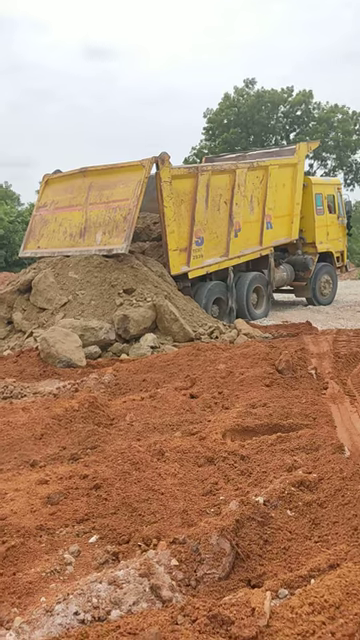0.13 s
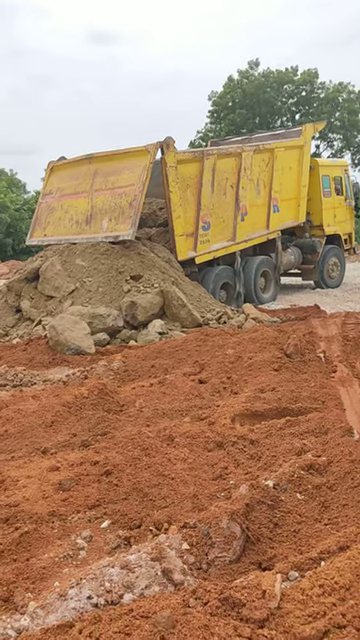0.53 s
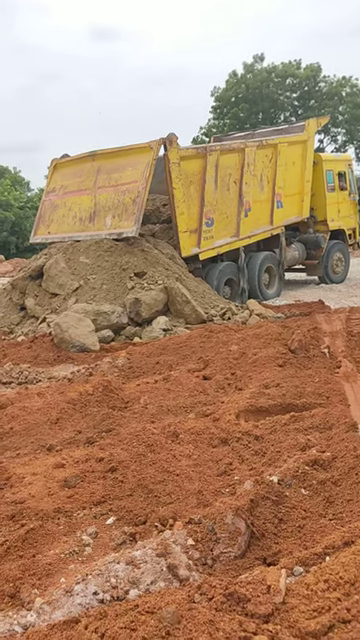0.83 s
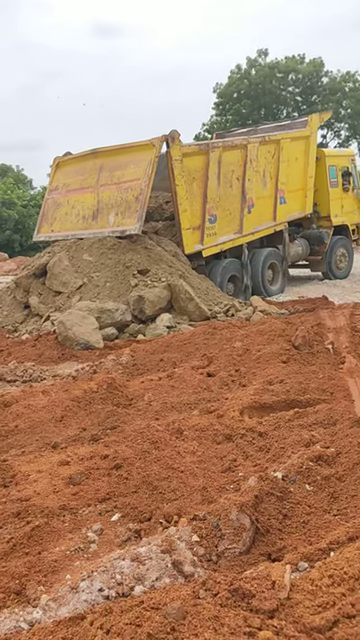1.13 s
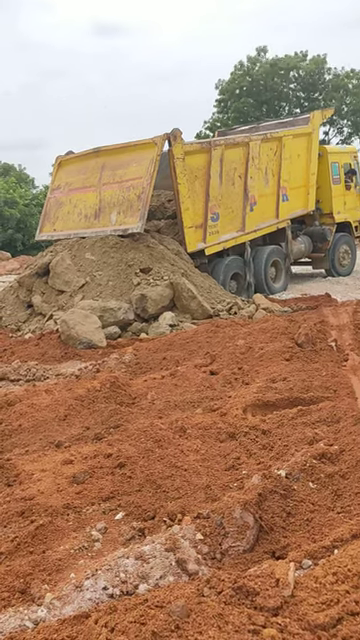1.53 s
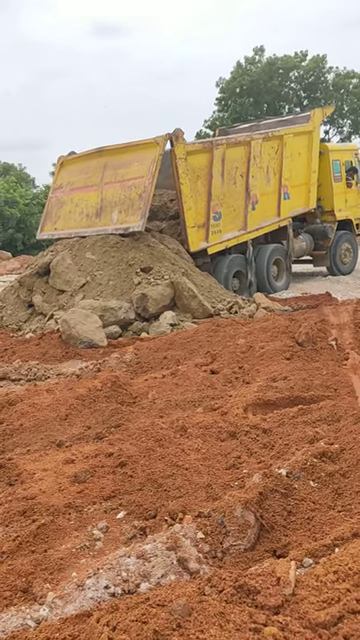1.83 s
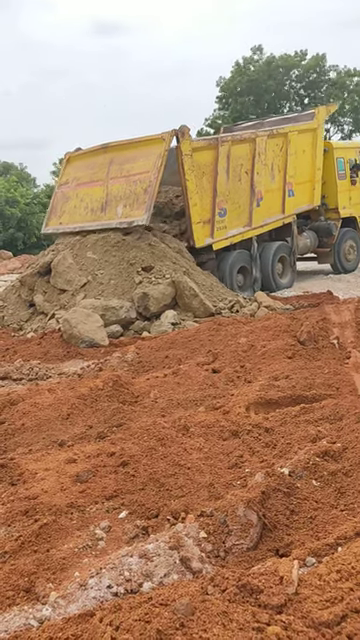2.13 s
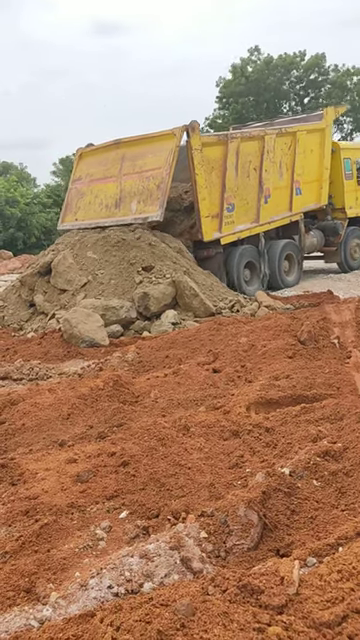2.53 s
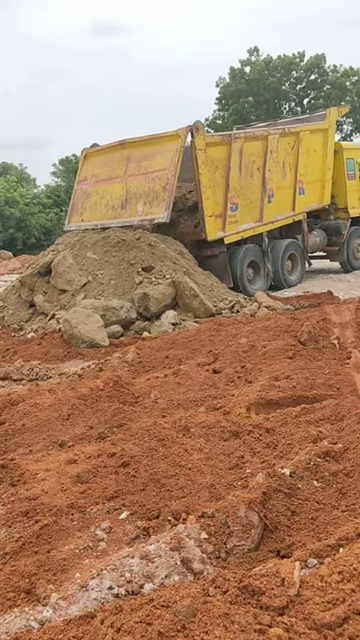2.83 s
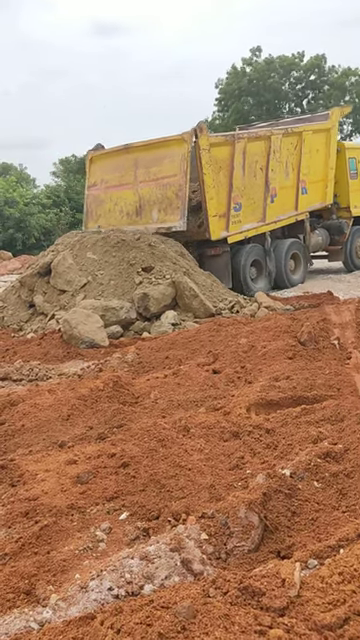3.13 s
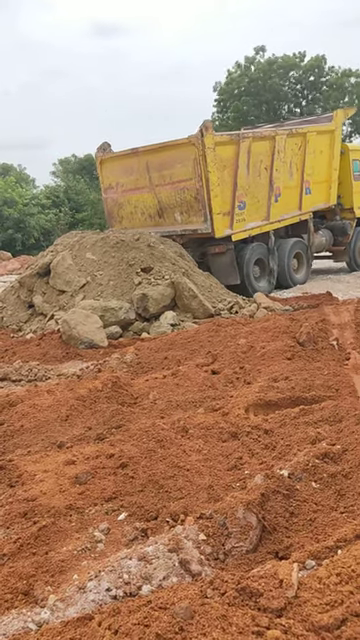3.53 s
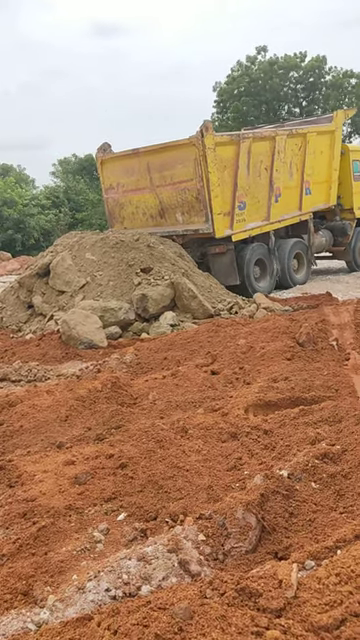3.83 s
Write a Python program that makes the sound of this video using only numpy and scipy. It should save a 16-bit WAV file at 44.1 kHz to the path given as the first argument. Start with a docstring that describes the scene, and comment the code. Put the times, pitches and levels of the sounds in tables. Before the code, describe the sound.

A tipper truck's steel tailgate slams late with a booming, ringing crash, then rebounds and seats. Before it, a diesel ticks at idle, wind buffets the microphone and loose steel clanks. Outdoors, stereo, some way off.

```python
"""Tipper truck and slamming tailgate

A tipper truck creeps away from its heap at idle: repeated bursts of noise make its diesel tick.
Its raised body clanks in short knocks and scrapes, shaped by the uneven resonances of steel.
The steel tailgate slips off the heap, slams, booms, rebounds once and seats: noise and tones that ring.
Gusts of low noise buffet the two ports of a microphone some way off, mostly the left one."""
import sys
import numpy as np
from scipy import signal
from scipy.fft import rfft, irfft, next_fast_len
from scipy.io import wavfile
from scipy.ndimage import map_coordinates

SR = 44100
rng = np.random.default_rng(int(sys.argv[2]) if len(sys.argv) > 2 else 0)


def store_pcm(level_fs):
    """Save levels as 16-bit WAV."""
    pcm = np.round(np.clip(level_fs, -1, 1) * 32767).astype(np.int16)
    wavfile.write(sys.argv[1], SR, np.atleast_2d(pcm).T)


N = 176400

# Spectra give the shape of a noise, whose overall level is set elsewhere.
# Rise and decay times are those of exponential curves.

# How the engine's loudness moves. Each row: time in seconds, relative loudness in dB.
ENGINE_LOUDNESS = [(.65, -2.5), (1.1, 0.5), (1.27, -2), (1.4, 1.5), (1.65, 2), (2.6, -1)]
# Spectra of the engine's clatter (also its whirr), knock and rumble.
# Each row: frequency in Hz, relative level in dB per Hz.
CLATTER_SPECTRUM = [(150, -12), (370, -5), (560, -4.5), (800, 3.5), (1050, -3.5), (1450, 0), (1750, -6),
                    (2750, -4.5), (3500, -11.5), (5500, -14), (7700, -8), (9200, -19)]
KNOCK_SPECTRUM = [(400, -0.5), (900, 1), (1400, 2.5), (2000, -6), (9000, -17)]
RUMBLE_SPECTRUM = [(80, 1.5), (125, -14), (200, -2), (500, -18), (1500, -40.5)]
# Faint whine of the engine's pump. Each row: frequency in Hz, middle level in dB.
PUMP_HUM = [(446.6, -53.5)]
FIRING_HZ, FIRST_FIRING_S, CYLINDERS = 26.26, 0.0186, 4
CLATTER_DB, CLATTER_DECAY_S, FIRING_RISE_S = -40.5, 0.014, 0.0015
KNOCK_DB, KNOCK_DECAY_S = -46, 0.021  # one cylinder knocks harder
WHIRR_DB, RUMBLE_DB = -35, -33.5

# Strength of the wind on each port. Each row: time in seconds, relative strength in dB.
GUSTS_LEFT = [(.55, -29), (.72, -28), (.95, -41.5), (1.5, -39.5), (1.62, -32), (1.83, -37.5), (1.92, -14),
              (2.06, -22.5), (2.12, -30), (2.28, -17), (2.68, -17.5), (2.9, -22.5), (3.1, -34), (3.18, -22),
              (3.6, -24.5)]
GUSTS_RIGHT = [(0, -39.5), (.55, -28.5), (.9, -46.5), (1.56, -37), (1.8, -29), (2.05, -34), (2.6, -29.5),
               (2.88, -23.5), (2.905, -17.5), (2.96, -30.5), (4, -36.5)]
# Spectra of the slow pressure swings, and of the flutter that strong gusts add.
# Each row: frequency in Hz, relative level in dB per Hz.
BUFFET_SPECTRUM = [(30, 0), (100, -0.5), (300, -11), (1500, -69)]
FLUTTER_SPECTRUM = [(30, -33), (80, -4), (170, 0.5), (270, -6.5), (400, -13.5), (800, -25), (4000, -71)]
# Both levels hold when the gust strength equals WIND_REF_DB.
BUFFET_DB, FLUTTER_DB, WIND_REF_DB = -27, -25.5, -26
BUFFET_GROWS = 0.78  # dB of swing for each dB of gust
LUMP_DB, LUMPS_PER_S = 1.7, 26  # size and rate of the random lumps in the flutter
RIGHT_FLUTTER_PITCH = 1.28  # the right port flutters higher than the left

# Clanks of the tipping gear. Each row: start in seconds, relative level of the knock in dB,
# relative level of the scrape in dB, pitch of the scrape in Hz.
CLANK_EVENTS = [(2.568, -23.5, -21.5, 6600), (2.610, -31, -45, 5400), (2.626, -32, -28, 6850),
                (2.641, -24.5, -35, 6800), (2.694, -31, -54, 5400), (2.82, -28, -26, 5640),
                (2.872, -35, -37, 5540)]
# Spectrum of the knocks. Each row: frequency in Hz, relative level in dB per Hz.
CLANK_SPECTRUM = [(100, -31), (350, 6), (750, 9.5), (1150, -6), (1500, 1), (4500, -3.5), (8300, -12),
                  (11000, -41)]
CLANK_RISE_S, CLANK_DECAY_S, CLANK_TAIL_DB, CLANK_TAIL_S = 0.0062, 0.014, -7.5, 0.054
SCRAPE_SHARPNESS = 6.4  # higher is closer to a single pitch

# Sharp eddies that thud on the right port. Each row: start in seconds, relative level in dB.
EDDY_EVENTS = [(2.897, -17.5), (2.918, -13.5)]
EDDY_PITCH, EDDY_DECAY_S = 1.94, 0.01  # pitch relative to the left port's flutter

# Blows of the tailgate. Each row: start in seconds, relative level of the clashing edges in dB,
# relative level of the ringing panel in dB.
TAILGATE_BLOWS = [(3.388, -26.5, -55), (3.409, -23, -26), (3.450, -12, -40), (3.465, -14, -10.5),
                  (3.552, -15.5, -41), (3.607, -20, -25), (3.802, -11, -32), (3.866, -23.5, -25)]
# Spectra of the clashing edges, the ringing panel, the crack of a blow and the sizzle of the slam.
# Each row: frequency in Hz, relative level in dB per Hz.
CLASH_SPECTRUM = [(700, -16), (2500, -1.5), (3700, -10.5), (6000, -9.5), (7700, 2), (9000, -11),
                  (11000, -40)]
PANEL_SPECTRUM = [(40, -1), (110, 5), (300, 0), (500, -4), (800, 1.5), (1020, -8), (1350, -2.5),
                  (1700, -11.5), (2700, -8.5), (3700, -18.5), (6000, -19), (7800, -9), (11000, -30.5)]
CRACK_SPECTRUM = [(100, 10), (600, 11), (2500, 3.5), (4000, -13), (15000, -26)]
SIZZLE_SPECTRUM = [(7000, -26), (10000, -7), (13500, -12.5)]
# How long the steel rings before the shut gate damps it.
# Each row: frequency in Hz, time to fall by 60 dB in seconds.
PANEL_RING_TIME = [(150, 8.1), (700, 4.1), (1400, 1.56), (3000, 0.97), (8000, 1.23), (12000, 0.13)]
# Strongest modes (natural tones) of the gate and body. Each row: frequency in Hz, relative level in dB.
STRONG_MODES = [(123, -9), (236, 1), (277, -1.5), (356, -13.5), (390, -3.5), (442, -7), (590, -8),
                (643, -5.5), (718, -2), (825, -3), (1306, -8), (2842, -15), (7623, -5.5), (8101, -6)]
CLASH_RISE_S, CLASH_DECAY_S = 0.0058, 0.033
MODES_DB = -11  # added to every strong mode
LOW_RISE_S, LOW_RISE_HZ = 0.025, 200  # rise time of the level at this pitch; lower pitches rise more slowly
CRACK_DB, CRACK_RISE_S, CRACK_DECAY_S = 8.5, 0.0021, 0.0064  # level relative to the blow's ring
SEATED_S, SEATED_DB_PER_S = 3.79, 48  # from this time the shut gate damps the ring
SEATED_HZ = 600  # strong modes below this pitch are damped less
SLAM_S, REBOUND_S = TAILGATE_BLOWS[3][0], TAILGATE_BLOWS[6][0]
THUMP_DB, THUMP_HZ, THUMP_DECAY_S = -19.5, 56.8, 0.12  # the rebound shakes the chassis
SIZZLE_DB, SIZZLE_DECAY_S = -6, 0.03  # only the slam sizzles

# Loose contacts and uneven resonances, for the clanks and the tailgate alike.
CONTACTS_PER_S, CONTACT_DECAY_S = 170, 0.003
CONTACT_SHARE = 0.4  # part of the power that comes in brief contacts
RESONANCE_DB, RESONANCE_DENSITY = 2.6, 2.2  # unevenness, and random heights per root Hz

# Colour of each microphone port; above about 9.5 kHz all sound also falls steeply. Each row: frequency in Hz,
# gain in dB.
COLOUR_LEFT = [(100, 3), (2500, -1.5), (4500, -4), (6300, -13), (7300, -14), (8400, 1.5), (9200, -0.5),
               (9800, -17)]
COLOUR_RIGHT = [(4300, -2.5), (5500, 2.5), (6300, -1.5), (7700, 5), (9200, 0), (9800, -14.5)]
# How much sound differs between the ports.
# Each row: frequency in Hz, scattered over direct sound as a ratio.
SCATTER_RATIO = [(100, 0.13), (600, 0.37), (2000, 0.74), (8000, 1)]
LEFT_LAG_S = 0.00018
TOP_HZ = 15550


def amp(db):
    """Turn decibels into gain."""
    return 10 ** (np.asarray(db) / 20)


def unit(x):
    """Scale a sound to an rms (average strength) of 1."""
    return x / np.sqrt(np.mean(x ** 2) + 1e-20)


def along(points, hz):
    """Read a table of (Hz, value) between its points, on a log frequency axis."""
    f, v = np.transpose(points)
    return np.interp(np.log(hz + 1), np.log(f + 1), v)


def since(s):
    """Seconds passed since time s, zero before it."""
    return np.maximum(np.arange(N) / SR - s, 0)


def curve(points):
    """Turn (seconds, value) points into one value per sample."""
    return np.interp(since(0), *np.transpose(points))


def wobble(rate):
    """A smooth random curve with this many random knots a second."""
    knots = rng.standard_normal(int(N * rate / SR) + 4)
    return map_coordinates(knots, [np.arange(N) * rate / SR], order=2)


def filtered(x, response):
    """Multiply each frequency of x by a response, with spare room after the end."""
    m = next_fast_len(N + 8192, True)
    hz = np.fft.rfftfreq(m, 1 / SR)
    return irfft(rfft(x, m) * response(hz), m)[..., :N]


def noise(spectrum):
    """Mono noise of rms 1 with a given spectrum."""
    return unit(filtered(rng.standard_normal(N), lambda hz: amp(along(spectrum, hz))))


def spread(spectrum, lift=lambda hz: 0):
    """Stereo noise of rms 1: a direct part, and a scattered part that differs between the ports."""
    def shape(hz):
        shares = np.array([np.ones_like(hz), along(SCATTER_RATIO, hz)])
        return amp(along(spectrum, hz) + lift(hz)) * shares

    direct, scattered = filtered(rng.standard_normal((2, N)), shape)
    return unit(np.array([direct + scattered, direct - scattered]))


def burst(t, rise, decay):
    """A quick rise and an exponential fall."""
    return (1 - np.exp(-t / rise)) * np.exp(-t / decay)


def engine():
    """Cylinders clatter in turn, one with a hard knock, over fan whirr, pump hum and a low rumble."""
    cycle_s = CYLINDERS / FIRING_HZ
    # seconds since each cylinder last fired
    ages = [(since(0) - FIRST_FIRING_S - k / FIRING_HZ) % cycle_s for k in range(CYLINDERS)]
    firings = unit(sum(burst(age, FIRING_RISE_S, CLATTER_DECAY_S) for age in ages))
    clatter = amp(CLATTER_DB + wobble(13)) * firings * spread(CLATTER_SPECTRUM)
    knocks = unit(burst(ages[0], FIRING_RISE_S, KNOCK_DECAY_S))
    knock = amp(KNOCK_DB + wobble(10)) * knocks * spread(KNOCK_SPECTRUM)

    # the whirr follows the loudness curve strongly, the clatter weakly
    loudness_db = curve(ENGINE_LOUDNESS)
    whirr = amp(WHIRR_DB + 1.83 * loudness_db) * spread(CLATTER_SPECTRUM)
    hum = np.zeros(N)
    for hz, db in PUMP_HUM:
        level = amp(db + 2 * wobble(2.33))
        hum += level * unit(np.sin(2 * np.pi * hz * since(0) + wobble(1.97)))
    rumble = amp(RUMBLE_DB) * spread(RUMBLE_SPECTRUM)
    return amp(0.36 * loudness_db) * clatter + knock + whirr + hum + rumble


def flutter(pitch):
    """Turbulence at a port, its spectrum shifted by a pitch ratio."""
    return noise([(hz * pitch, db) for hz, db in FLUTTER_SPECTRUM])


def wind(gusts, pitch=1):
    """Buffeting at one port: lumpy flutter grows faster with the gust than the slow swings do."""
    gust_db = curve(gusts) - WIND_REF_DB
    swings = amp(BUFFET_DB + BUFFET_GROWS * gust_db) * noise(BUFFET_SPECTRUM)
    lumps_db = LUMP_DB * wobble(LUMPS_PER_S)
    return swings + amp(FLUTTER_DB + gust_db + lumps_db) * flutter(pitch)


def steel():
    """Dense, uneven resonances of one steel body: dB for each Hz, spaced wider towards the treble."""
    heights = rng.standard_normal(SR)
    return lambda hz: RESONANCE_DB * np.interp(RESONANCE_DENSITY * np.sqrt(hz), np.arange(SR), heights)


def rattle():
    """Gain of rms 1 for loose steel: brief contacts at random times, each of its own strength."""
    contacts = (rng.random(N) < CONTACTS_PER_S / SR) * rng.exponential(size=N)
    # each contact adds power that dies away
    power = signal.lfilter([1], [1, -np.exp(-1 / (CONTACT_DECAY_S * SR))], contacts)
    return np.sqrt(1 - CONTACT_SHARE + CONTACT_SHARE * power / power.mean())


def clanks():
    """Loose steel knocks, scrapes and rattles as the truck rolls; the body rings on faintly."""
    out, body = np.zeros((2, N)), steel()
    for s, knock_db, scrape_db, pitch in CLANK_EVENTS:
        t = since(s)
        tail = amp(CLANK_TAIL_DB) * burst(t, CLANK_RISE_S, CLANK_TAIL_S)
        shape = burst(t, CLANK_RISE_S, CLANK_DECAY_S) + tail

        def scrape_lift(hz):
            # the scrape is loudest around its pitch
            return body(hz) - 20 * np.log10(1 + (SCRAPE_SHARPNESS * (hz / pitch - 1)) ** 2)

        knock = amp(knock_db) * spread(CLANK_SPECTRUM, body)
        scrape = amp(scrape_db) * spread(CLANK_SPECTRUM, scrape_lift)
        out += shape / shape.max() * (knock + scrape)
    return out * rattle()


def eddies():
    """Short, higher thuds of turbulence at the crest of a gust."""
    thuds = sum(amp(db) * burst(since(s), EDDY_DECAY_S / 2, EDDY_DECAY_S) for s, db in EDDY_EVENTS)
    return thuds * 2 * flutter(EDDY_PITCH)


def ringing(hz, age):
    """Level of the ring after a blow: low pitches rise more slowly, and each pitch has its own ring time."""
    rise = 1 - np.exp(-age * hz / (LOW_RISE_S * LOW_RISE_HZ))
    return amp(-60 * age / along(PANEL_RING_TIME, hz)) * rise


def panel(s, gate):
    """One blow's crack and its dense wash of the gate's resonances, each pitch fading at its own rate."""
    # split one second of noise into short frames and pitches, then shape each
    hz, frames, z = signal.stft(spread(PANEL_SPECTRUM, gate)[:, :SR], SR, nperseg=256)
    wash = signal.istft(z * ringing(hz[:, None], frames), SR, nperseg=256)[1]
    placed_wash = np.pad(wash, ((0, 0), (round(s * SR), N)))[:, :N]
    crack = amp(CRACK_DB) * burst(since(s), CRACK_RISE_S, CRACK_DECAY_S) * spread(CRACK_SPECTRUM)
    return placed_wash + crack


def gate_tones():
    """The strongest modes stand out: every blow feeds them, and low ones ring on after the gate seats."""
    out = np.zeros(N)
    for hz, db in STRONG_MODES:
        powers = [(amp(ring_db) * ringing(hz, since(s))) ** 2 for s, _, ring_db in TAILGATE_BLOWS]
        fed = np.sqrt(sum(powers))
        damped_db = SEATED_DB_PER_S * since(SEATED_S) * min(hz / SEATED_HZ, 1)
        phase = 2 * np.pi * (hz * since(0) + rng.random()) + 0.33 * wobble(20)
        out += amp(db + MODES_DB - damped_db) * fed * np.sin(phase)
    return out


def tailgate():
    """Each blow rattles the edges and rings the same panel; the slam sizzles and the rebound thumps."""
    gate = steel()
    rings = sum(amp(ring_db) * panel(s, gate) for s, _, ring_db in TAILGATE_BLOWS)
    damped_rings = rings * rattle() ** 0.5 * amp(-SEATED_DB_PER_S * since(SEATED_S))

    powers = [(amp(clash_db) * burst(since(s), CLASH_RISE_S, CLASH_DECAY_S)) ** 2
              for s, clash_db, _ in TAILGATE_BLOWS]
    chatter = np.sqrt(sum(powers)) * spread(CLASH_SPECTRUM, gate)
    sizzle_shape = burst(since(SLAM_S), CLANK_RISE_S, SIZZLE_DECAY_S)
    sizzle = amp(SIZZLE_DB) * sizzle_shape * spread(SIZZLE_SPECTRUM)
    clashes = (chatter + sizzle) * rattle()

    age = since(REBOUND_S)
    thump = amp(THUMP_DB) * burst(age, CLASH_RISE_S, THUMP_DECAY_S) * np.sin(2 * np.pi * THUMP_HZ * age)
    return damped_rings + gate_tones() + clashes + thump


def scene():
    """The truck stands to the right and reaches the left port late; each port has its colour and wind."""
    def ports(hz):
        colours = amp([along(COLOUR_LEFT, hz), along(COLOUR_RIGHT, hz)])
        delays_s = LEFT_LAG_S * np.array([[1], [0]])
        return colours * np.exp(-2j * np.pi * hz * delays_s)

    truck = filtered(engine() + clanks() + tailgate(), ports)
    wind_right = wind(GUSTS_RIGHT, RIGHT_FLUTTER_PITCH) + eddies()
    return truck + np.array([wind(GUSTS_LEFT), wind_right])


def record(dry):
    """Clip at full scale, then keep nothing above the band limit."""
    return filtered(np.clip(dry, -1, 1), lambda hz: hz < TOP_HZ)


dry = scene()
out = record(dry)
store_pcm(out)
```